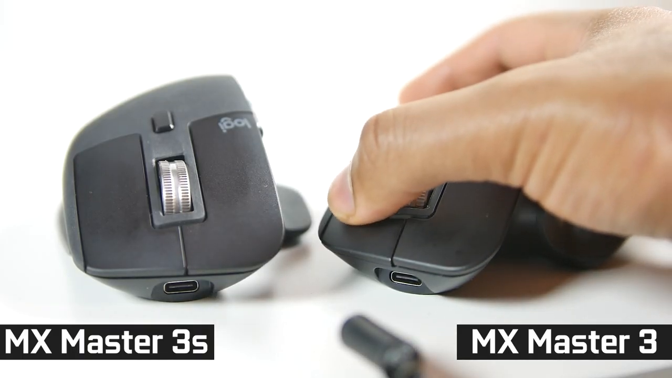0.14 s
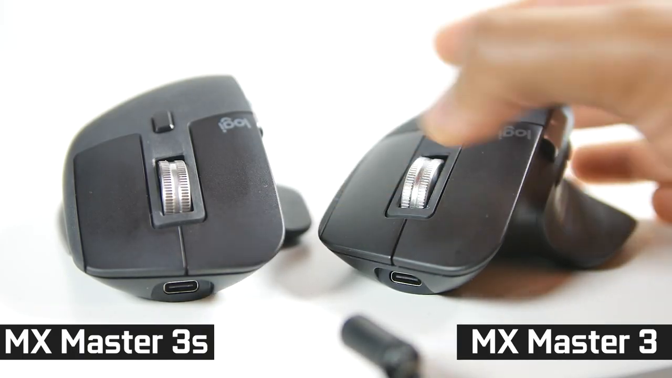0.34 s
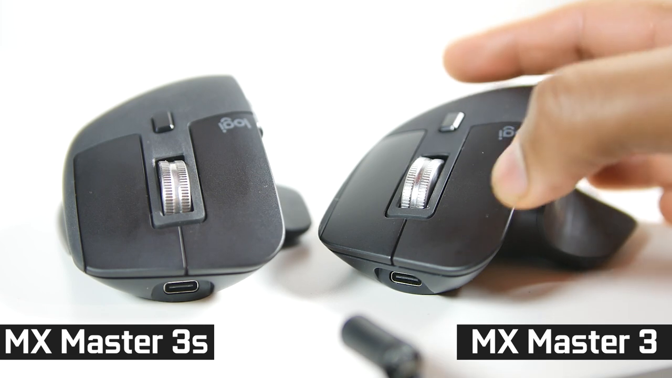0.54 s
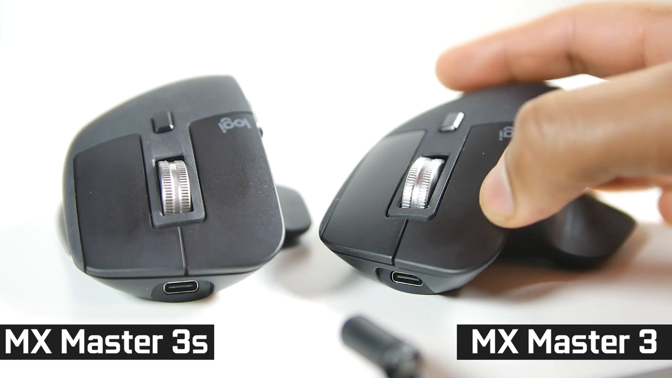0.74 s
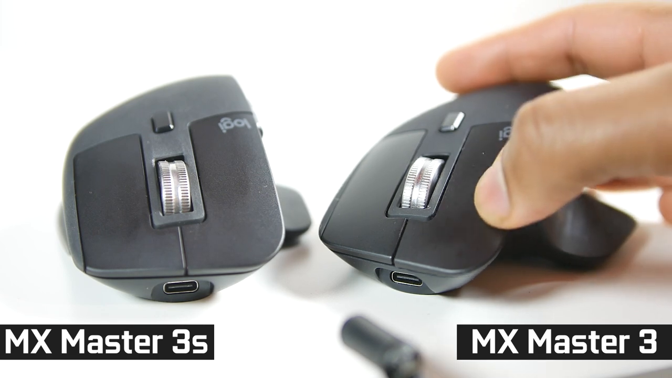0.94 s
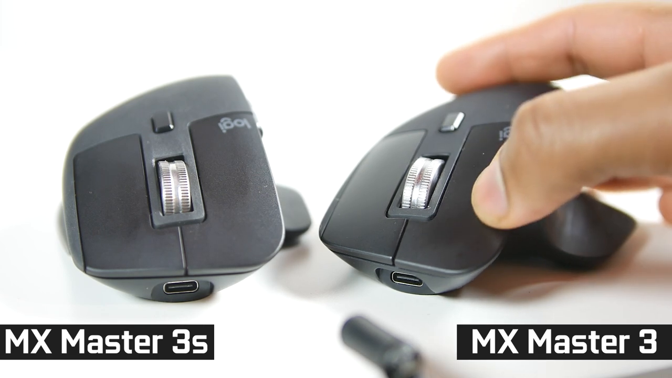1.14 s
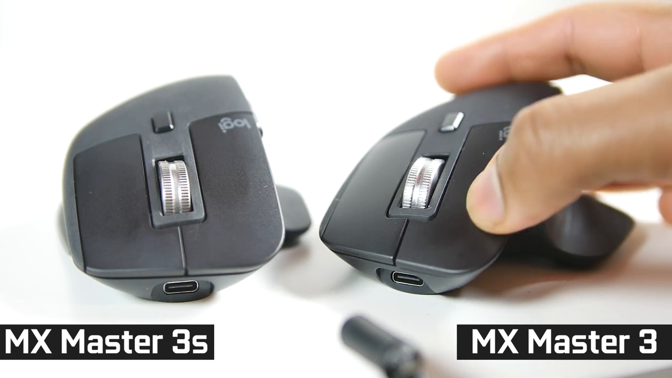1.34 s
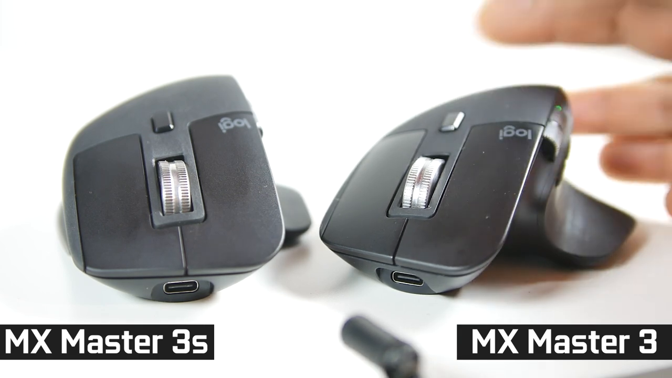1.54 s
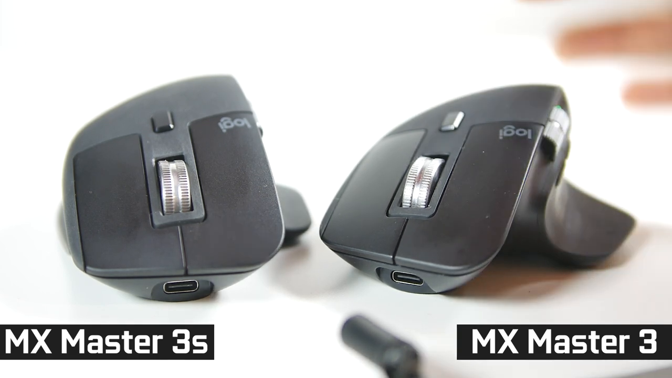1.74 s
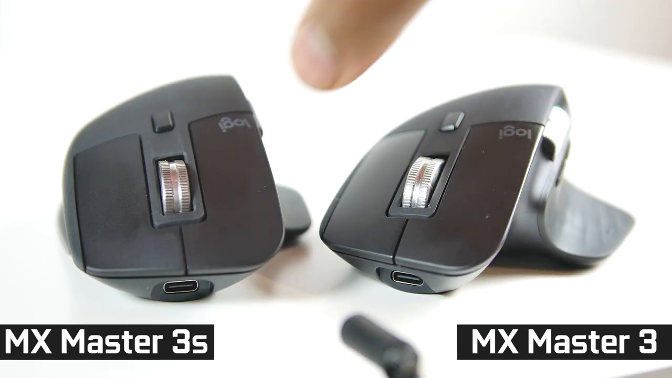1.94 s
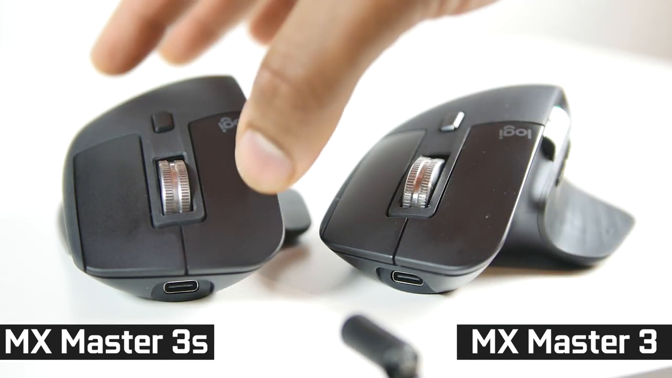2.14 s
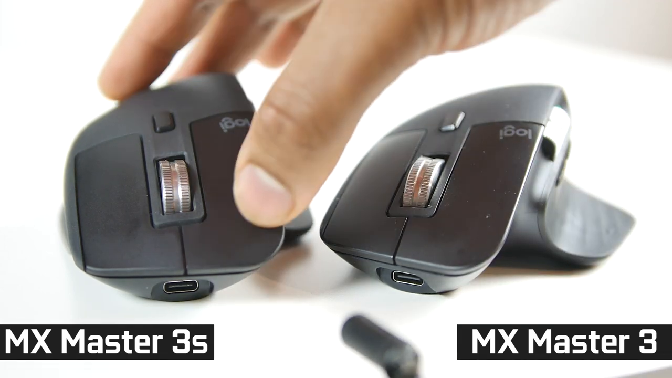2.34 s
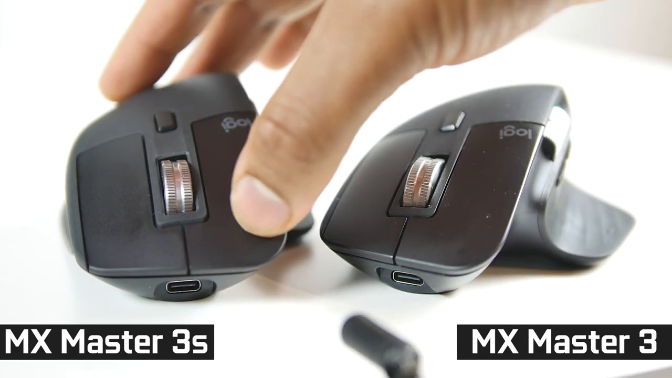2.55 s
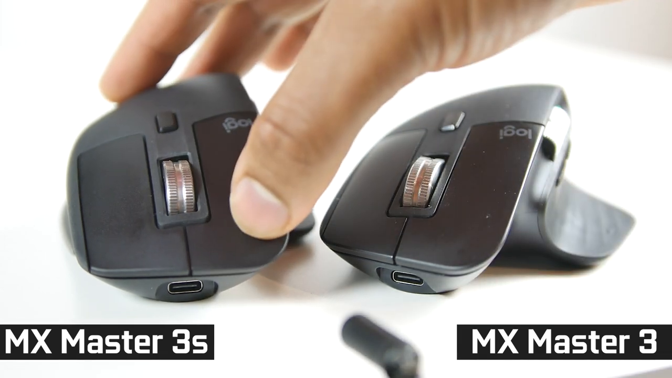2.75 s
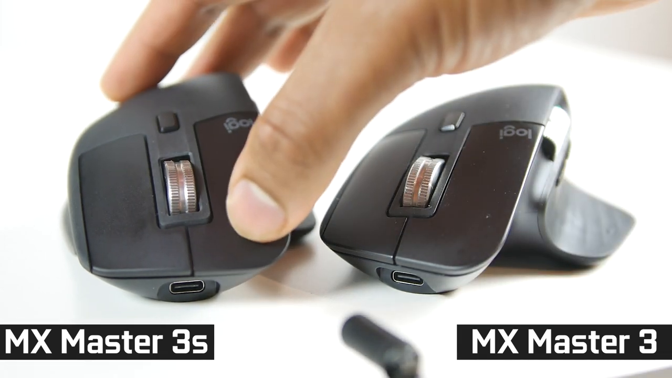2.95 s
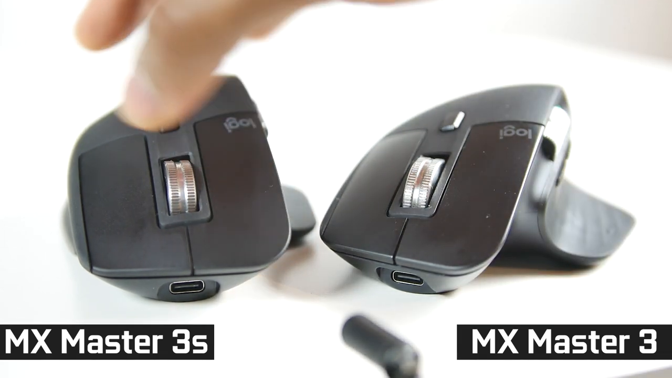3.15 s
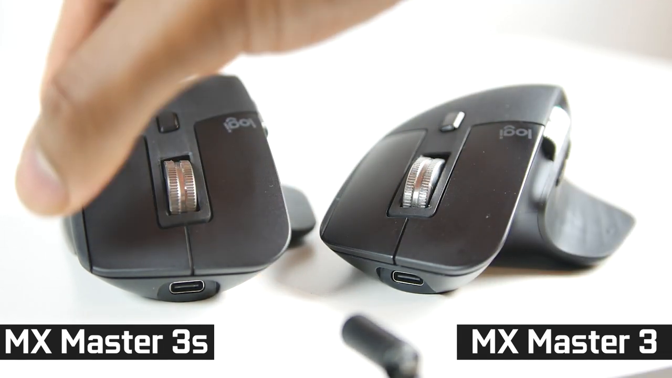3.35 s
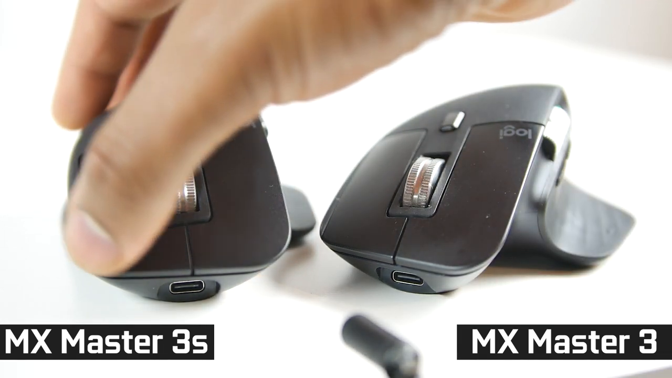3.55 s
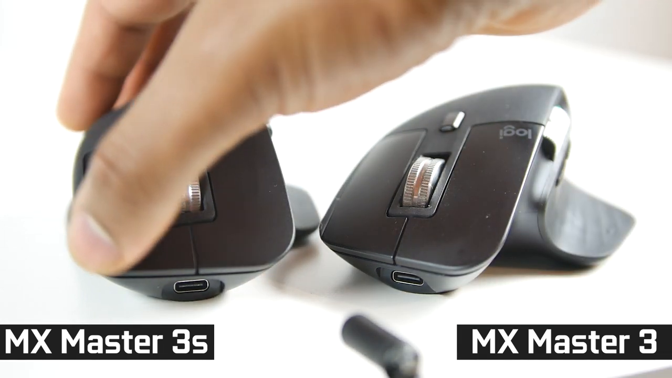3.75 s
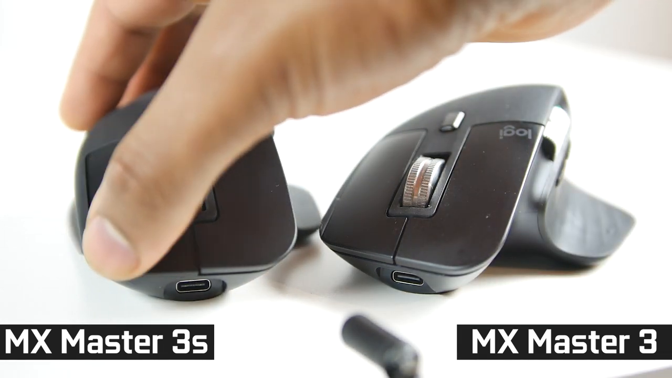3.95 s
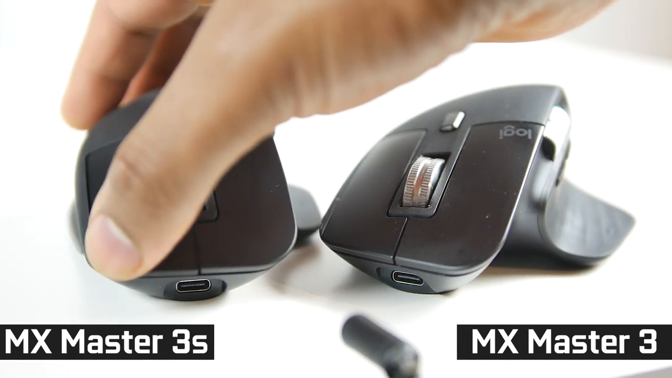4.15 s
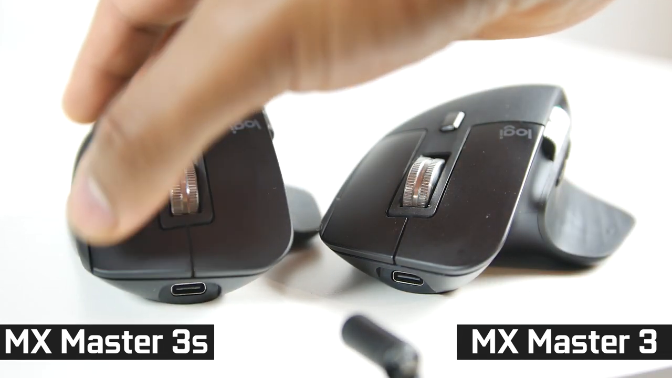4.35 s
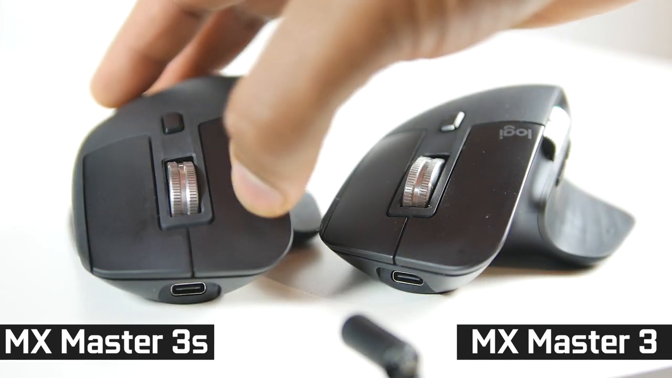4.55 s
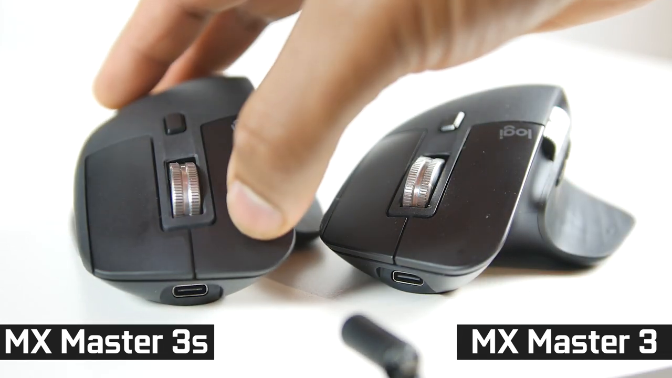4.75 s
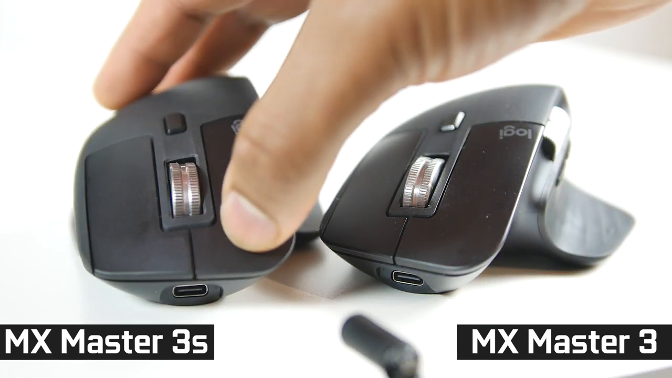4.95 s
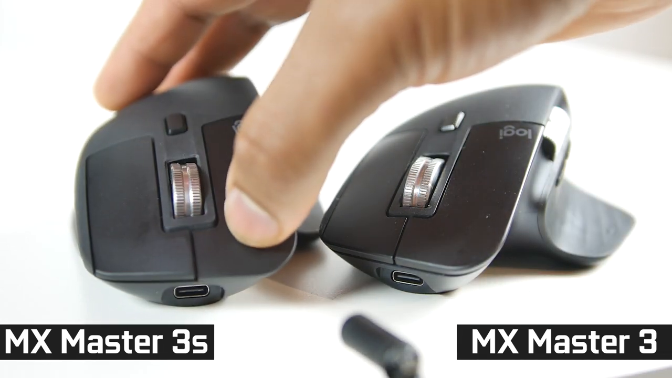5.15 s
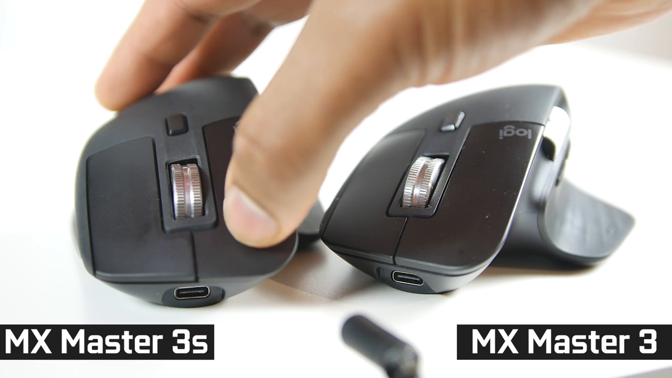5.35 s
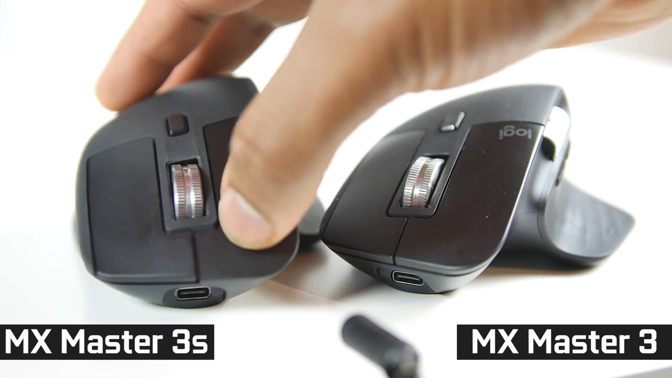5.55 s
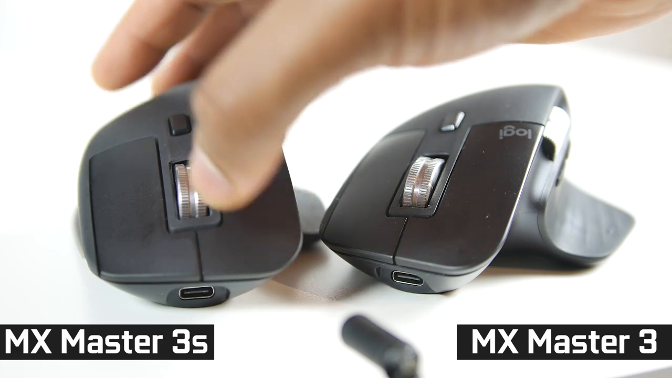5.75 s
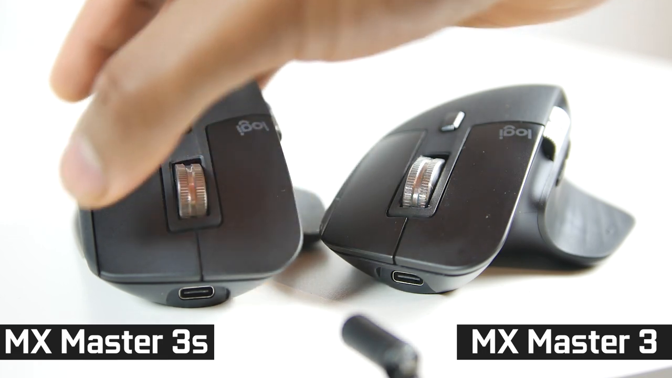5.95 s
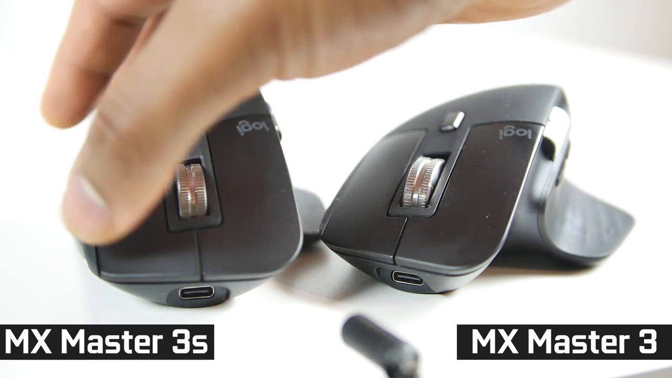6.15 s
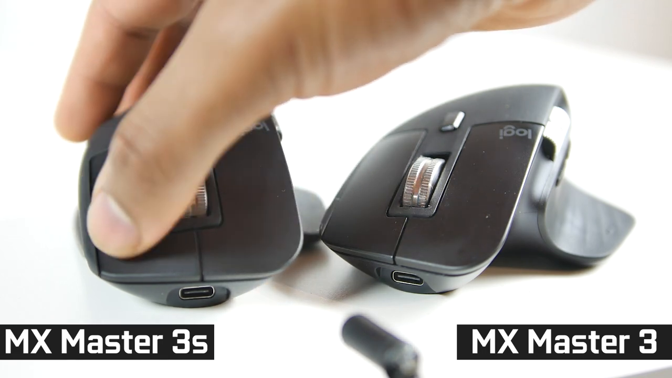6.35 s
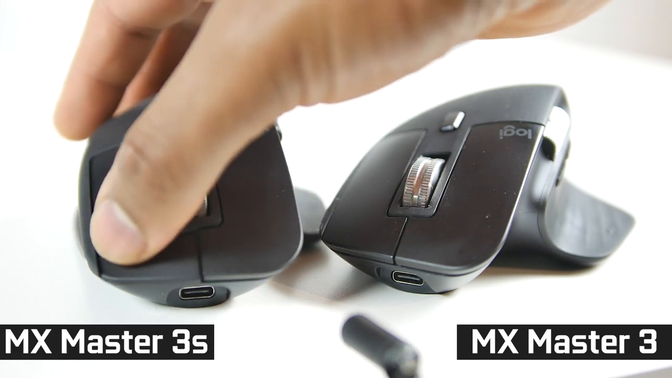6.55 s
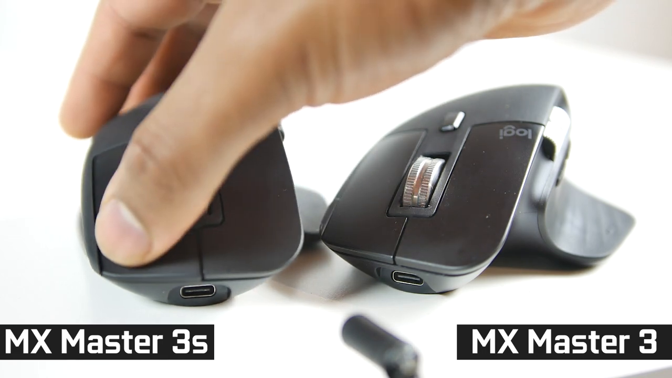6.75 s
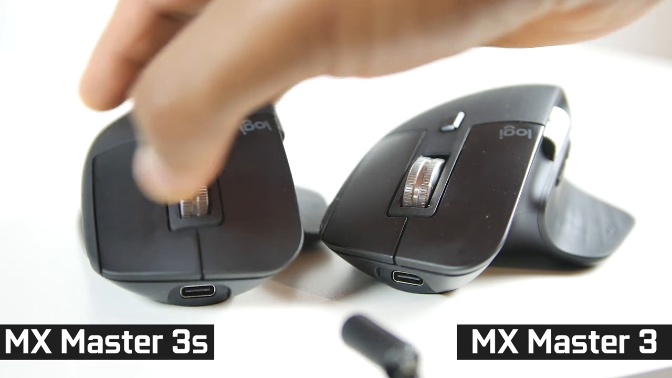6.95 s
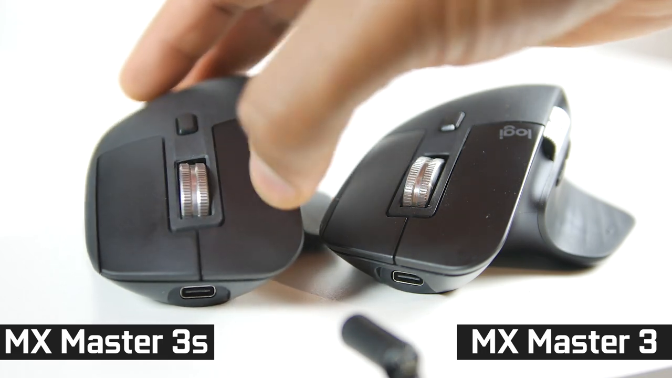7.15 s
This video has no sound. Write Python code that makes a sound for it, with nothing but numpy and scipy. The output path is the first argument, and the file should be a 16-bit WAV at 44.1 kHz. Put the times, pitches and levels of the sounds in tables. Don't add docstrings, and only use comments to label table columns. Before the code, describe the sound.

Very close microphone at a desk in a quiet small room. A mouse button gives five quick press-and-release clicks, bright, metallic and slightly buzzing. A thumb shifts with small knocks, then a second, damped mouse is clicked in four short runs, alternating buttons: low, dry plastic thuds with soft ticks, far quieter than the first. Light skin rubs fill the gaps over faint hiss, rumble and a thin electric whine that stops partway.

```python
import sys
import numpy as np
from scipy import signal
from scipy.fft import rfft, irfft, next_fast_len
from scipy.io import wavfile
from scipy.ndimage import uniform_filter1d, map_coordinates

SR = 44100
rng = np.random.default_rng(int(sys.argv[2]) if len(sys.argv) > 2 else 0)


def persist_wave(psi):
    counts = np.round(np.clip(psi, -1, 1) * 32767).astype(np.int16)
    wavfile.write(sys.argv[1], SR, np.atleast_2d(counts).T)


def level_to_linear(level):
    exponent = np.asarray(level, float) / 20
    return 10 ** exponent


N = 321489

# time in seconds, peak in dB, buzz in dB, lead scrape in dB, desk push in dB.
SNAPS_DOWN = [
    (.0930, -6.5, -42, -41.5, -58),
    (0.7314, -5, -34, -39, -52.5),
    (0.9478, -7, -35.5, -49.5, -59.5),
    (1.1624, -6, -34, -39, -66.5),
    (1.3513, -4.5, -34, -25.5, -49),
]
SNAPS_UP = [
    (0.2048, -4.5, -49, -16, -52),
    (0.8264, -5, -25.5, -42.5, -59.5),
    (1.0624, -4, -22.5, -35.5, -63),
    (1.2539, -4, -20.5, -43, -53),
    (1.448, -3, -40.5, -39, -58.5),
]
RATTLE_DOWN_MS, RATTLE_UP_MS = 1.5, 1.73
RATTLE_DB = -3
BOUNCE_DOWN, BOUNCE_UP = (0.6, 0.44), (1.2, 0.6)
BUZZ_MS, BUZZ_MS_PER_DB = 24, 0.5
BUZZ_PATCH_DB = 4.5
# centre in Hz, width in Hz, level in dB.
LEAF_PEAKS = [(5800, 120, -9), (6150, 750, -2), (7800, 400, 1.5), (11470, 2800, -0.5), (12600, 860, 2),
              (14760, 460, 6.5)]
# frequency in Hz, level in dB.
SNAP_COLOUR = [(1500, -26), (3000, -15.5), (4500, -1), (7000, -3), (9500, -4.5), (12000, -2.5), (15500, -6),
               (16500, -16.5)]
BUZZ_COLOUR = [(1200, -15), (2500, -8.5), (5500, -0.5), (9000, -7), (12000, -1), (15000, -3), (16300, -18)]
# frequency in Hz, level in dB, t60 in seconds.
LEAF_DOWN = [(4300, -9.5, .009), (5300, -7.5, 0.0079), (6240, -1.5, .009), (6800, -8, 0.0091),
             (7950, -1, .007), (9150, -10, .006), (9850, -8.5, .006), (10650, -9, .007),
             (11510, -2.5, .008), (12250, -1.5, .008), (13400, -8, .007), (14100, -8.5, .007),
             (15100, 2, .007)]
LEAF_UP = [(3614, -12.5, .012), (4700, -11.5, .01), (5525, -7.5, .01), (6260, -4.5, .01),
           (7000, -8.5, 0.011), (7976, -0.5, .011), (9800, -9.5, .01), (10400, -5.5, .01), (11505, 1, .011),
           (12080, 0.5, .01), (12830, -1, .01), (14000, -5, .01), (15265, 0.5, 0.012)]
OTHER_LEAF_DOWN = [(4083, -13.5, 0.012), (5197, -10, 0.011), (6912, -10.5, 0.0089), (10310, -2.5, 0.0069),
                   (10980, -1, 0.0067), (11840, -0.5, 0.0067), (13230, -21, 0.012), (14220, -20, 0.015),
                   (15340, -20.5, 0.0096)]
OTHER_LEAF_UP = [(3620, -23, 0.02), (4151, -3, 0.0029), (5760, -12, 0.011), (6912, -22.5, 0.011),
                 (8700, -3, 0.0032), (9728, -15.5, 0.0084), (10660, -13.5, 0.01), (11100, -17, 0.011),
                 (12860, 1, 0.0066), (15140, -13, 0.0085)]

# time in seconds, thud in dB, thud in Hz, edge in dB.
ANSWERS_DOWN = [(.093, -29, 797, -8.5), (.109, -37, 613, -12.5), (.188, -42.5, 860, -5),
                (.732, -29, 734, -8), (.741, -30, 750, -15.5), (.949, -26.5, 666, -8.5),
                (.961, -31.5, 800, -23), (1.163, -27, 708, -10.5), (1.176, -36, 1040, -9),
                (1.341, -31.5, 598, -11.5), (1.351, -27.5, 648, -7), (1.357, -22, 763, -4.5)]
HELD_T60_S = 0.036
# time in seconds, thud in dB, thud in Hz, edge in dB, t60 in seconds.
ANSWERS_UP = [(0.0, -37.5, 908, -31.5, .07), (.205, -30.5, 774, -2, .04), (.212, -29.5, 958, -7, .09),
              (.826, -28, 659, -4, .03), (.835, -32.5, 755, -20, .05), (1.063, -26.5, 668, -7.5, .04),
              (1.071, -28.5, 667, -12.5, .06), (1.254, -29.5, 663, -2.5, .04),
              (1.260, -29, 664, -6.5, .075), (1.449, -26, 654, -7.5, .095)]

# frequency in Hz, level under the thud in dB, t60 in seconds.
FIRST_SHELL = [(797, -5.5, 0.04), (947, -4.5, 0.03), (1265, -10.5, .03), (1460, -7, 0.029)]
LEFT_SHELL = [(800, -13, 0.018), (940, -13, 0.025), (1100, -17, .02), (1270, -17, 0.025),
              (1547, -13, 0.033), (2050, -22, .015)]
RIGHT_SHELL = [(601, -11, 0.028), (679, -14, 0.036), (856, -16.5, 0.028), (1095, -12.5, 0.019),
               (1438, -20.5, 0.037)]
# frequency in Hz, level in dB, t60 in seconds.
EDGE = [(1810, -14, .012), (2300, 0, .015), (2740, -3, .014), (3350, -11, .01), (3750, -15, .01),
        (4400, -12, .007)]
RIGHT_EDGE = [(1750, -3.5, 0.011), (2226, -6.5, 0.021), (2573, 1, 0.011), (3080, -4, 0.0074),
              (3810, -7, 0.011), (4160, -10.5, 0.014)]
EDGE_LAG_S = 0.0008
# frequency in Hz, level in dB.
TICK = [(2500, 0), (4500, 3.5), (7500, -4), (11000, 1.5), (13000, -4), (15000, -0.5), (16500, -14.5)]
TICK_FOLLOWS = 1.4
# centre in Hz, width in Hz, level in dB.
LEFT_PING = [(10940, 500, 4.6)]
RIGHT_PING = [(13450, 1200, 4)]
LEFT_HOLD, RIGHT_HOLD = (12.5, 0.3), (6.5, 0.35)
NO_HOLD = (99, 1)
AIR_DOWN_DB, AIR_UP_DB, AIR_RIGHT_DB = -3.5, -6.5, 5

# thud in Hz, t60 in seconds, edge in dB, tick in dB, crunch in ms.
FIRST_TOUCH = (718, 0.04, -14.5, 2.5, 7.5)
LEFT_DOWN, LEFT_UP = (683, 0.03, -19.5, -11.5, 3.5), (669, 0.0444, -18, -11.5, 9)
LEFT_STOP, LEFT_TOUCH = (950, 0.021, 5.4, 3.1, 2.6), (711, 0.007, -6, -3, 6)
LEFT_SCRAPE = (900, 0.012, 3, -8, 30)
RIGHT_DOWN, RIGHT_UP = (816, 0.03, -21.5, -11, 3.5), (785, 0.01, -23, -16.5, 10.5)
RIGHT_SLACK, RIGHT_TOUCH = (827, 0.03, -11.5, -5.5, 8), (838, 0.05, -14.5, -20, 5)
RIGHT_REBOUND = (823, 0.06, -24, -12, 6)

# time in seconds, thud in dB, brightness in dB.
FIRST_TOUCHES = [
    (.068, -47.5, -1.5),
    (.436, -40.5, 1),
    (.714, -39, 2),
    (1.141, -39, -0.5),
    (1.553, -41, -6.5),
    (1.612, -41, 7),
    (1.683, -54, 4.5),
]
# time in seconds, thud in dB, brightness in dB, desk push in dB.
LEFT_DOWNS = [(2.474, -21, 3.5, -57), (2.655, -19, 3.5, -62.5), (2.878, -19, 5.5, -55.5),
              (4.863, -20, 1, -59), (5.156, -19.5, 2.5, -60.5), (5.386, -20.5, 4, -57),
              (5.58, -17, 7.5, -50.5)]
LEFT_UPS = [(2.589, -23, 0.2, -52), (2.793, -24, -2, -56.5), (3.007, -24.5, 5, -54.5),
            (4.992, -24, -1, -54.5), (5.27, -22, 1, -57), (5.508, -22, -3.5, -54), (5.707, -23.5, 1.5, -55)]
RIGHT_DOWNS = [(3.634, -21.5, .4, -60), (3.936, -20.5, .3, -60), (4.202, -18.5, 2.6, -60),
               (6.254, -17.5, 3.5, -51), (6.517, -17.5, 0.94, -53.5), (6.753, -18.5, 0.5, -55)]
RIGHT_UPS = [(3.753, -23, 3.5, -56), (4.09, -25, -4.5, -56), (4.317, -21.5, -1, -51.5),
             (6.353, -24.5, -1.5, -52), (6.644, -21, 3, -54.5), (6.83, -22, 2.5, -49)]
# time in seconds, thud in dB, brightness in dB.
LEFT_STOPS = [(2.508, -35.5, 4), (2.898, -38.5, 9.5), (4.901, -38.5, 1.5), (5.184, -36.5, -0.5),
              (5.421, -40, -1.5), (5.593, -36, 7.5)]
# time in seconds, thud in dB, brightness in dB.
RIGHT_SLACKS = [(3.604, -29.5, 5.5), (3.86, -30, 0.5), (4.165, -38.5, -2), (6.241, -31.5, 3.5),
                (6.495, -35.5, 2.5), (6.731, -37.5, 3)]
# time in seconds, thud in dB, brightness in dB.
RIGHT_REBOUNDS = [
    (4.327, -31, -4),
    (6.36, -33, -2),
    (6.651, -32, -5),
    (6.838, -30.5, 4.5),
]
# time in seconds, thud in dB, brightness in dB.
LEFT_SCRAPES = [
    (4.931, -39, 0),
    (7.135, -47, 0),
]
# time in seconds, thud in dB, brightness in dB.
LEFT_TOUCHES = [(2.244, -49, 1), (2.29, -40.5, -5), (2.364, -59, 9), (2.451, -33, 1), (2.557, -39.5, -3.5),
                (2.865, -50, 5.5), (2.997, -35.5, 2.5), (4.813, -41.5, 4), (5.09, -53, -2),
                (5.144, -33.5, -0.5), (5.245, -40, -9), (5.358, -41.5, 0.5), (5.473, -40, -7),
                (5.567, -38, 3), (5.663, -41, -7)]
RIGHT_TOUCHES = [(3.344, -50, 7), (3.714, -51, -8), (3.735, -41.5, -8), (3.774, -41.5, -14),
                 (4.048, -41.5, 1.5), (4.119, -45.5, -1), (4.223, -36, 7.5), (4.274, -48.5, -.5),
                 (4.537, -48.5, 11), (6.032, -56, -0.5), (6.602, -38.5, 3.5), (7.1, -49.5, 9.5)]

# peak in seconds, length in seconds, hiss in dB, body in dB.
RUBS = [(-.015, 0.11, -49.5, -58), (0.358, .12, -51, -63), (0.427, 0.15, -52, -76),
        (0.452, 0.12, -74, -56.5), (1.555, 0.043, -78, -64), (1.625, 0.093, -70, -64),
        (1.734, 0.048, -55, -64.5), (0.209, 0.048, -50, -48), (0.94, 0.032, -62, -45),
        (1.386, 0.26, -72, -70), (2.368, .06, -83.5, -66.5), (3.354, 0.046, -62.5, -64),
        (3.69, 0.2, -70.5, -68.5), (4.345, 0.11, -62.5, -57), (4.572, 0.075, -84.5, -66),
        (4.637, 0.063, -69, -65), (4.945, 0.06, -59.5, -57), (6.034, 0.021, -80, -67),
        (6.252, 0.036, -51.5, -50), (6.775, 0.042, -63, -55.5), (7.167, 0.083, -63, -55.5)]
RUB_RISE = 0.41
# frequency in Hz, level in dB per Hz.
SKIN = [(1760, -36), (3000, -7.5), (5310, -5), (6860, -5.5), (14500, -4), (15700, -10.5), (16500, -43.5)]
SKIN_BODY = [(300, -11.5), (700, 3.5), (1000, 1), (1600, -6.5), (2500, -4.5), (3600, -10.5)]

# time in seconds, desk push in dB, upper modes in dB.
HAND = [(0.0, -53.5, -10), (.331, -53.5, -11.5), (.438, -66, 7.5), (1.547, -58, -3), (1.618, -49, -2.5),
        (1.718, -59.5, -7), (2.253, -54, -16), (2.281, -58, -11.5), (3.078, -63, -20), (3.349, -54, -19),
        (3.601, -54.5, -6), (3.867, -63.5, -1.5), (4.539, -54.5, -18), (4.809, -63, -6.5),
        (6.028, -60.5, -20.5), (7.109, -61, -5)]
# frequency in Hz, level in dB, t60 in seconds.
DESK = [(86.24, 0, 0.36), (154.4, -1.5, 0.22), (215, -5, 0.22), (269, -1.5, 0.18), (342, -6.5, 0.29),
        (433, -1.5, .1)]
CLICK_UPPER_DB, UPPER_FOLLOWS = -61.5, 0.3
DESK_SIDE_DB = -32
# time in seconds, level in dB.
KNOCKS = [
    (.436, -49),
    (1.554, -52),
    (1.572, -55),
    (1.612, -44),
    (1.628, -50),
]
# frequency in Hz, level in dB, t60 in seconds.
KNOCK = [(242, -5, 0.035), (340, 0, 0.038), (537, -1.5, 0.025)]

# frequency in Hz, level in dB.
GLANCE = [(400, -13.5), (800, -15), (1500, -3), (3000, -1), (6000, 1), (15000, -1.5)]
# frequency in Hz, t60 in seconds, level in dB.
ROOM = [(500, 0.49, -10), (1540, .14, 1), (5000, .18, -8), (8500, 0.46, -16), (12040, .17, -9)]
# frequency in Hz, level in dB.
WHINE = [(1483.7, -73), (2967.4, -77), (4451, -89), (7418.5, -86), (8902, -90), (11869.5, -91),
         (13353, -90)]
# time in seconds, level in dB.
WHINE_ON = [
    (0, 4),
    (.4, -2),
    (.7, -11),
    (.9, -2),
    (1.5, 4.5),
    (2.4, 1),
    (3.3, 3),
    (4.3, 4),
    (4.62, -1.5),
    (4.7, -22),
]
# frequency in Hz, level in dB per Hz.
HISS = [(45, 9), (120, -8.5), (400, -10), (600, 3), (1200, 0.5), (8000, -2.5), (15500, -2.5), (15900, -37)]
TOP_HZ, TOP_FADE_HZ = 16600, 900


def unit(x):
    return x / np.sqrt(np.mean(x ** 2) + 1e-20)


def along(points, hz):
    f, v = np.transpose(points)
    return np.interp(np.log(hz + 1), np.log(f + 1), v)


def curves(rows, outside_db=-140):
    s, *cols = np.transpose(rows)
    return [np.interp(np.arange(N) / SR, s, c, outside_db, outside_db) for c in cols]


def wobble(rate):
    knots = rng.standard_normal(int(N * rate / SR) + 4)
    return map_coordinates(knots, [np.arange(N) * rate / SR])


def coloured(x, spectrum, peaks=()):
    m = next_fast_len(x.shape[-1] + 4096)
    f = np.fft.rfftfreq(m, 1 / SR)
    gain = level_to_linear(along([(spectrum[0][0] / 2, -80), *spectrum, (17500, -80)], f))
    lift = 1 + sum(level_to_linear(db + 0.5) * 1j * f * w / (c * c - f * f + 1j * f * w) for c, w, db in peaks)
    return irfft(rfft(x, m) * gain * lift, m)[..., :x.shape[-1]]


def noise(spectrum, size=N):
    return unit(coloured(rng.standard_normal(size), spectrum))


def patchy(x, depth_db):
    z = rfft(x)
    hills = uniform_filter1d(rng.standard_normal(len(z)), size=30)
    hills = uniform_filter1d(hills, size=30)
    return unit(irfft(z * level_to_linear(depth_db * unit(hills)), len(x)))


def delayed(x, s):
    k = round(s * SR)
    return np.r_[np.zeros(k), x[:len(x) - k]]


def add(track, s, sound):
    track[max(round(s * SR), 0):][:len(sound)] += sound


def ring(modes, t, rise, spread_db, loose=0.):
    chance = rng.standard_normal((len(modes), 2))
    tones = 0
    for (hz, db, t60), (u, v) in zip(modes, chance):
        level = level_to_linear(db + spread_db * u - 60 * t / t60)
        tones = tones + level * np.sin(2 * np.pi * hz * (1 + loose * v) * t)
    return tones * (1 - np.exp(-(t / rise) ** 2))


def switch():
    track, t = np.zeros(N + SR), np.arange(SR // 12) / SR - 0.006
    late = np.maximum(t, 0)
    snaps = [(*row, RATTLE_DOWN_MS, BOUNCE_DOWN, LEAF_DOWN if k else OTHER_LEAF_DOWN)
             for k, row in enumerate(SNAPS_DOWN)]
    snaps += [(*row, RATTLE_UP_MS, BOUNCE_UP, LEAF_UP if k else OTHER_LEAF_UP)
              for k, row in enumerate(SNAPS_UP)]
    for s, db, buzz_db, lead_db, _, rattle_ms, (bounce_ms, share), leaf in snaps:
        span = late / (rattle_ms / 1000)
        rattle = (np.exp(-(span / 1.3) ** 3) + 0.24 * np.exp(-span / 2.0)) * (1 - np.exp(-late / 0.0001))
        lead = level_to_linear(lead_db - RATTLE_DB) * np.exp(-((t + 0.0035) / 0.0008) ** 2)
        burst = coloured((rattle + lead) * rng.standard_normal(len(t)), SNAP_COLOUR, LEAF_PEAKS)

        tones = -ring(leaf, late, rise=0.00004, spread_db=1.6, loose=0.005)
        tones = tones + share * delayed(tones, bounce_ms / 1000)
        tones = tones * (np.exp(-(span / 1.9) ** 4) + 0.15)
        tones = coloured(tones, [(3000, -12), (4200, 0), (15500, 0), (16300, -14)])
        snap = tones / np.linalg.norm(tones) + level_to_linear(RATTLE_DB) * burst / np.linalg.norm(burst)

        buzz_ms = max(BUZZ_MS + BUZZ_MS_PER_DB * (buzz_db + 30), 10)
        fading = level_to_linear(buzz_db - 200 * late) * np.exp(-(late / (buzz_ms / 1000)) ** 6) * (t > 0)
        buzz = fading * patchy(noise(BUZZ_COLOUR, size=len(t)), BUZZ_PATCH_DB)
        add(track, s - 0.006, level_to_linear(db - 8.5) * (snap * np.linalg.norm(rattle) + buzz))
    return track[:N]


def crunch(t, ms):
    chance, size = rng.random(len(t)), rng.standard_normal(len(t))
    cluster = 0.5 * size * (chance < 0.035) * np.exp(-t / (ms / 1000))
    return np.r_[1, cluster[1:]]


def thud(t, hz, edge_db, t60, shell, rise, impacts, rim=EDGE, hold=NO_HOLD):
    edge = ring(rim, t, rise=0.0005, spread_db=2.5, loose=0.015)
    edge = signal.fftconvolve(impacts, edge)[:len(t)]
    body = ring([(hz, 0, t60)], t, rise, spread_db=0.5) + ring(shell, t, rise, spread_db=0.5, loose=0.042)
    choke_ms, left = hold
    body = body * (left + (1 - left) * np.exp(-(1000 * t / choke_ms) ** 4))
    body = signal.fftconvolve(np.r_[1, 0.26 * impacts[1:]], body)[:len(t)]
    return level_to_linear(-0.5) * body + level_to_linear(edge_db) * delayed(edge, EDGE_LAG_S)


def answers():
    track, t = np.zeros(N + SR), np.arange(SR // 8) / SR
    for s, db, hz, edge_db, t60 in [(*row, HELD_T60_S) for row in ANSWERS_DOWN] + ANSWERS_UP:
        shake = thud(t, hz, edge_db, t60, FIRST_SHELL, 0.0015, crunch(t, ms=7.2))
        add(track, s - 0.0008, level_to_linear(db) * shake)
    return track[:N]


def buttons(kinds, shell, rise, rim=EDGE, ping=(), hold=NO_HOLD):
    track, t = np.zeros(N + SR), np.arange(SR // 10) / SR
    tick_shape = level_to_linear(-60 * t / 0.0068) * (1 - np.exp(-t / 0.00088))
    for (hz, t60, edge_db, tick_db, ms), air_db, contacts in kinds:
        colour = [(f, db + air_db * (f > 9000)) for f, db in TICK]
        for s, db, bright_db, *_ in contacts:
            impacts = crunch(t, ms)
            fall = signal.fftconvolve(np.abs(impacts) ** 1.3, tick_shape)[:len(t)]
            grain = unit(coloured(rng.standard_normal(len(t)), colour, ping))
            tick = level_to_linear(tick_db + TICK_FOLLOWS * bright_db - 6.0) * grain * fall
            body = thud(t, hz, edge_db + bright_db, t60, shell, rise, impacts, rim, hold)
            add(track, s + 0.00037, level_to_linear(db) * (body + delayed(tick, EDGE_LAG_S)))
    return track[:N]


def damped_mouse():
    down, up = AIR_DOWN_DB, AIR_UP_DB
    left = [(LEFT_DOWN, down, LEFT_DOWNS), (LEFT_UP, up, LEFT_UPS), (LEFT_STOP, down, LEFT_STOPS),
            (LEFT_TOUCH, up, LEFT_TOUCHES), (LEFT_SCRAPE, up, LEFT_SCRAPES)]
    down = down + AIR_RIGHT_DB
    right = [(RIGHT_DOWN, down, RIGHT_DOWNS), (RIGHT_UP, up, RIGHT_UPS), (RIGHT_SLACK, down, RIGHT_SLACKS),
             (RIGHT_TOUCH, up, RIGHT_TOUCHES)]
    rebound = [(RIGHT_REBOUND, up, RIGHT_REBOUNDS)]
    both = buttons(left, LEFT_SHELL, rise=0.0008, ping=LEFT_PING, hold=LEFT_HOLD)
    both = both + buttons(rebound, RIGHT_SHELL, rise=0.002, rim=RIGHT_EDGE, ping=RIGHT_PING)
    return both + buttons(right, RIGHT_SHELL, rise=0.0008, rim=RIGHT_EDGE, ping=RIGHT_PING, hold=RIGHT_HOLD)


def skin():
    force, t = np.zeros((2, N)), np.arange(N) / SR
    for peak, length, *db in RUBS:
        corners = peak + length * np.array([-RUB_RISE, 0, 1 - RUB_RISE])
        stroke = np.interp(t, corners, [0, 1, 0]) ** 0.5
        force = force + level_to_linear(np.array(db))[:, None] * stroke
    slip = wobble(300)
    hiss = level_to_linear(1.2 * slip) * noise(SKIN)
    murmur = level_to_linear(2.2 * slip) * noise(SKIN_BODY)
    return force[0] * hiss + force[1] * murmur


def desk():
    track, t = np.zeros(N + SR), np.arange(SR // 2) / SR
    clicks = SNAPS_DOWN + SNAPS_UP + LEFT_DOWNS + LEFT_UPS + RIGHT_DOWNS + RIGHT_UPS
    pushes = HAND + [(s - 0.004, db, (1 - UPPER_FOLLOWS) * (-53.5 - db) + CLICK_UPPER_DB + 56.5)
                     for s, *_, db in clicks]
    for s, db, upper_db in pushes:
        low = ring(DESK[:1], t, rise=0.016, spread_db=0, loose=0.06)
        upper = ring(DESK[1:], t, rise=0.0074, spread_db=2.5, loose=0.043)
        add(track, s - 0.005, level_to_linear(db + 4.5) * (low + level_to_linear(upper_db - 4) * upper))
    for s, db in KNOCKS:
        add(track, s, -level_to_linear(db) * ring(KNOCK, t, rise=0.00065, spread_db=2.0, loose=0.05))
    return track[:N]


def glance(near):
    taps = noise(GLANCE, size=SR // 60) * np.hanning(SR // 60)
    return level_to_linear(-31.0) * signal.fftconvolve(near, taps / np.linalg.norm(taps))[:N]


def room(x):
    out, step = np.zeros((2, N + SR)), SR // 3
    band_hz, t60, db = np.transpose(ROOM)
    for k in range(0, N, step):
        hz, t, z = signal.stft(rng.standard_normal((2, step)), SR, nperseg=256)
        start_db = along(np.c_[band_hz, db], hz)[:, None]
        fall = start_db - 60 * t / along(np.c_[band_hz, t60], hz)[:, None]
        tail = signal.istft(z * level_to_linear(fall), SR, nperseg=256)[1]
        sides = [tail[0] + 0.24 * tail[1], tail[0] - 0.3 * tail[1]]
        wet = signal.fftconvolve(x[None, k:k + step], sides, axes=1)
        out[:, k + 150:k + 150 + wet.shape[1]] += wet
    return out[:, :N]


def whine():
    t = np.arange(N) / SR
    tones = sum(level_to_linear(db) * np.sin(2 * np.pi * hz * t) for hz, db in WHINE)
    return level_to_linear(curves(WHINE_ON)[0] + 0.5 + 1.1 * wobble(16)) * tones


def rumble():
    return level_to_linear(-58 + 0.67 * wobble(2.5)) * noise([(14, -1.0), (32, -0.5), (45, -8.0), (60, -22.5)])


def floor_hiss(apart):
    return level_to_linear(-69.0) * (noise(HISS) + level_to_linear(-8) * noise(HISS) * apart)


def scene():
    first = switch() + answers() + buttons([(FIRST_TOUCH, AIR_DOWN_DB, FIRST_TOUCHES)], FIRST_SHELL, rise=0.00078)
    shell_cut = signal.butter(8, 535, "high", fs=SR, output="sos")
    near = signal.sosfilt(shell_cut, first + damped_mouse() + skin())
    apart = np.array([[1], [-1]])
    table = desk() + rumble()
    mix = near * level_to_linear(0.1 * apart) + glance(near) * apart + level_to_linear(-43.0) * room(near)
    mix = mix + table + level_to_linear(DESK_SIDE_DB) * np.roll(table, SR // 400) * apart
    return mix + whine() + floor_hiss(apart)


def low_pass(x):
    return signal.sosfilt(signal.butter(12, 16830, fs=SR, output="sos"), x)


def record(dry):
    rounded = dry / (1 + np.abs(dry / 0.66) ** 6) ** (1 / 6)
    band = np.clip((TOP_HZ - np.fft.rfftfreq(N, 1 / SR)) / TOP_FADE_HZ, 0, 1)
    finished = irfft(rfft(rounded) * band, N)
    return low_pass(finished)


dry = scene()
out = record(dry)
persist_wave(out)
```